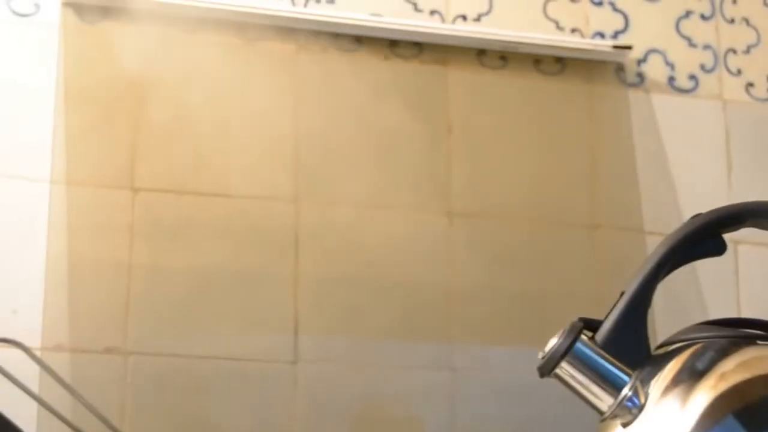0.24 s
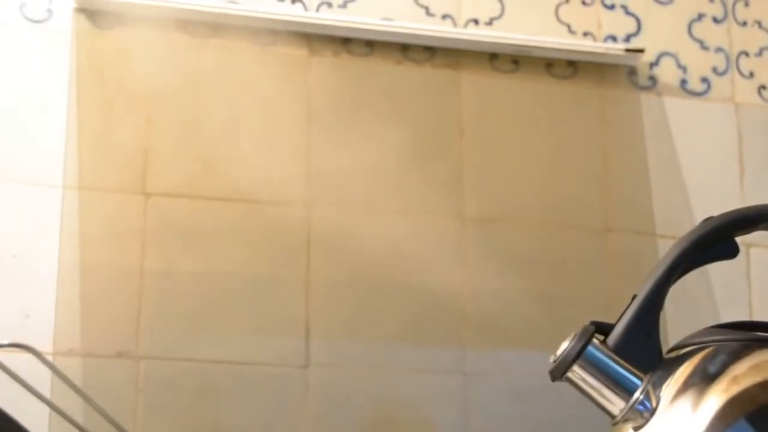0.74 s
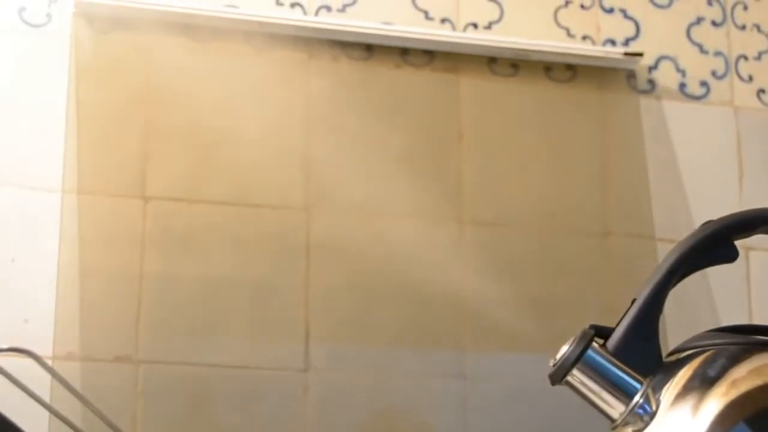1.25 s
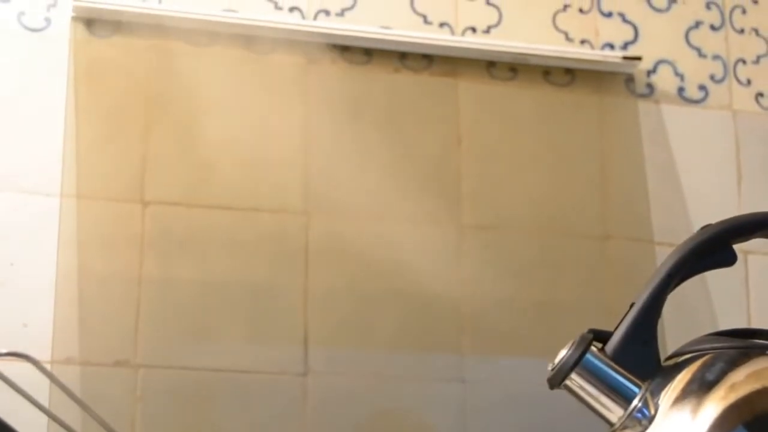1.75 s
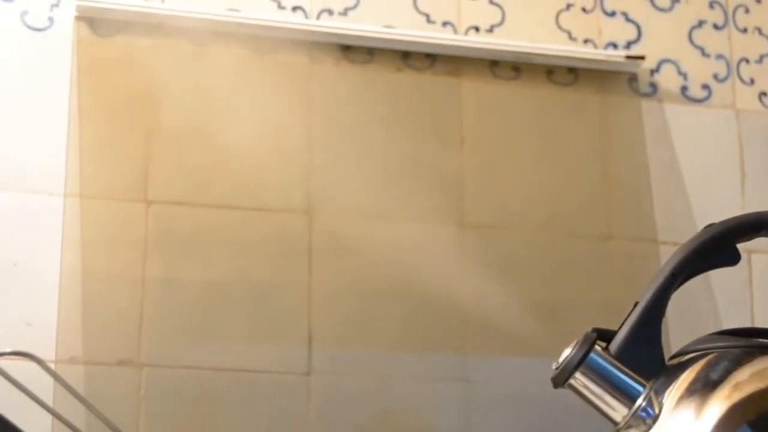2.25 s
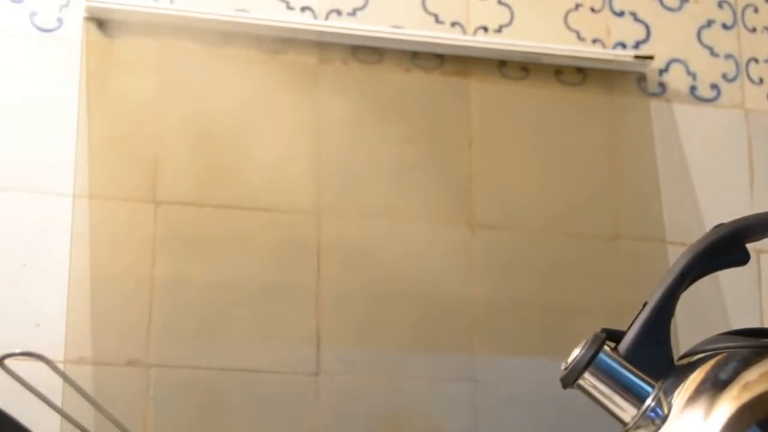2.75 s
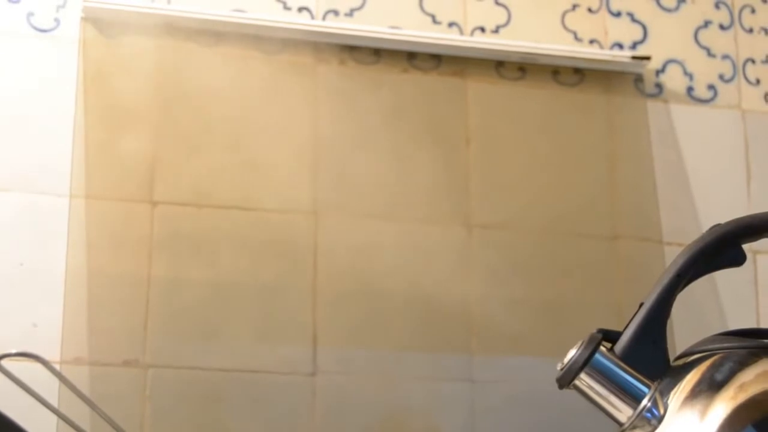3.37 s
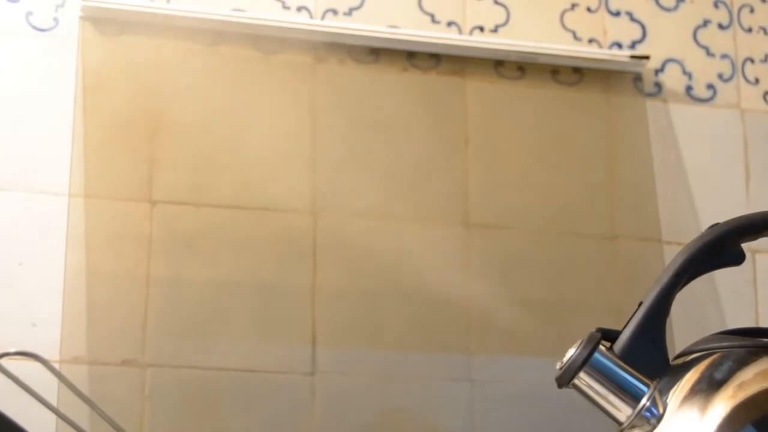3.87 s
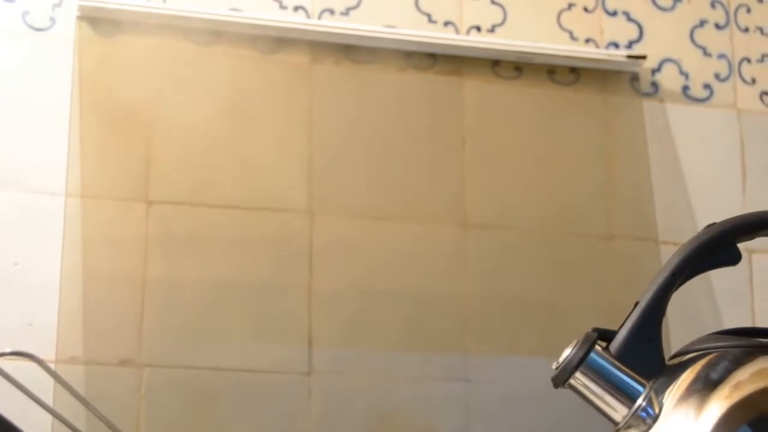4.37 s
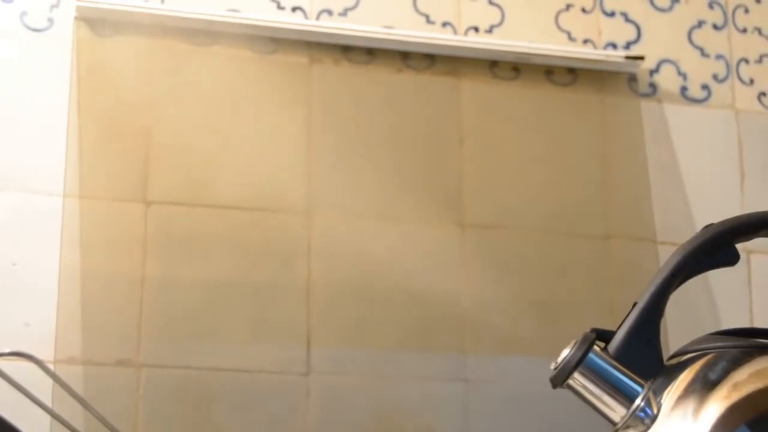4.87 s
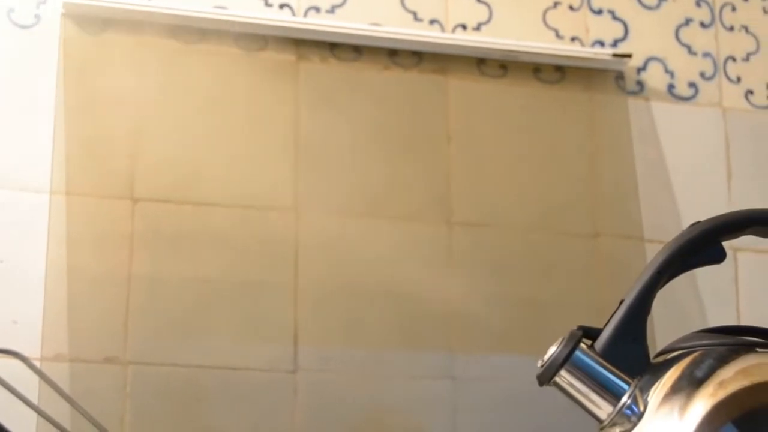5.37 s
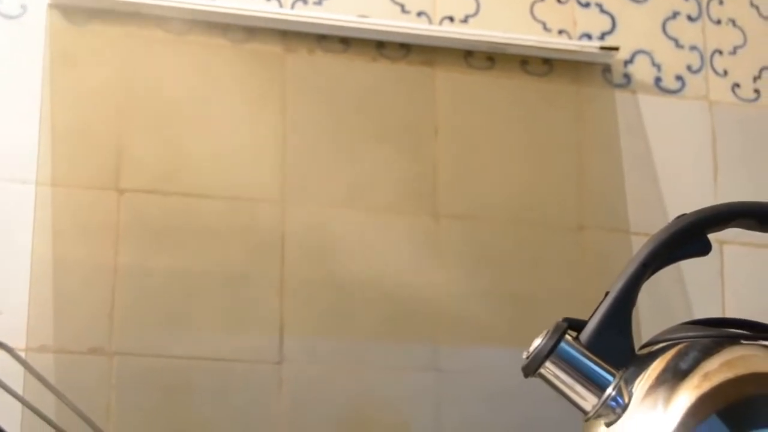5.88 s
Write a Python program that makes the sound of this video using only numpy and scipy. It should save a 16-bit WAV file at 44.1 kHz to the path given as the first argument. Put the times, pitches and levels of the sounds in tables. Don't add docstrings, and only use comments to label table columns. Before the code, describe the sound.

A stovetop kettle whistles a high, breathy, wavering note over hissing steam, with tiny droplet spits and a soft gas flame rush beneath.

```python
import sys
import numpy as np
from scipy import signal
from scipy.fft import rfft, irfft, next_fast_len
from scipy.io import wavfile
from scipy.ndimage import uniform_filter1d, map_coordinates

SR = 44100
rng = np.random.default_rng(int(sys.argv[2]) if len(sys.argv) > 2 else 0)


def unload_audio(sound):
    columns = np.transpose(np.atleast_2d(sound))
    steps = np.round(np.clip(columns, -1, 1) * 32767)
    wavfile.write(sys.argv[1], SR, steps.astype(np.int16))


def voltage_ratio(level):
    return 10 ** (np.asarray(level, float) / 20)


N = 269451
T = np.arange(N) / SR


def unit(x):
    return x / np.sqrt(np.mean(np.abs(x) ** 2) + 1e-20)


def along(points, hz):
    f, v = np.transpose(points)
    return np.interp(np.log(hz + 1), np.log(f + 1), v)


def curves(rows):
    time_s, *columns = np.transpose(rows)
    return [np.interp(T, time_s, column) for column in columns]


def wobble(rate_hz):
    knots = rng.standard_normal(1000)[:int(N * rate_hz / SR) + 4]
    return map_coordinates(knots, [T * rate_hz], mode="nearest")


def drift(bandwidth_hz):
    slow = signal.lfilter([1], np.poly([.8, .8]), rng.standard_normal(N))
    position = np.cumsum(bandwidth_hz) / SR * 2 * np.pi / np.log(1.25)
    return unit(map_coordinates(slow, [position]))


def filtered(x, response):
    m = next_fast_len(N + SR)
    return irfft(rfft(x, m) * response(np.fft.rfftfreq(m, 1 / SR)), m)[:N]


def rush(response, patchy_db):
    z = signal.stft(rng.standard_normal(N + 1024), nperseg=512)[2]
    field = uniform_filter1d(rng.standard_normal(z.shape), size=6, axis=0)
    field = uniform_filter1d(field, size=8, axis=1)
    noise = signal.istft(z * voltage_ratio(patchy_db * unit(field)), nperseg=512)[1][:N]
    return unit(filtered(noise, response))


def cavities(modes):
    def response(hz):
        power = 0
        for centre, width, db in modes:
            resonance = hz * width / (centre * centre - hz * hz + 1j * hz * width)
            power = power + voltage_ratio(2 * db) * np.abs(resonance) ** 4
        return np.sqrt(power)
    return response


def standing(waves, hz):
    return voltage_ratio(sum(db * np.exp(-4 * np.log(2) * ((hz - c) / w) ** 2) for c, w, db in waves))


# (time [s], hiss [dB], whistle [dB], pitch rise [Hz])
SURGES = [(.28, 3, 2, 0), (.65, 0, 2, 0), (1.12, 0, 2, -0.5), (1.68, 4, 0, 0), (2.0, -4, 1, 1.5),
          (2.15, 2, 0.5, 0), (2.4, 3, -1, -0.5), (2.68, 3, 2, 30.5), (3.0, 3, 0, 0), (3.62, -1, 2.5, 0),
          (3.9, 3, 0.5, 0), (4.27, 4.5, 2.5, 0.5), (4.48, 3, 2, -0.5), (4.87, 1.5, 2.5, 46.5),
          (5.2, 0.5, -0.5, -0.5), (5.38, -0.5, 2, 10), (5.679, 0.5, 0.5, 65.5), (5.84, 1, 4, -0.5),
          (6.1, 4, 0.5, 2.5)]


def surges():
    half_length_s = .055
    return sum(np.outer(gains, np.exp(-.5 * ((T - s) / half_length_s) ** 2)) for s, *gains in SURGES)


# (time [s], pitch [Hz], whistle level [dB])
STEAM = [(0, 5450, -32.5), (.17, 5400, -33.8), (.31, 5535, -34), (.5, 5310, -34.8), (.9, 5505, -33.2),
         (1.17, 5275, -33.8), (1.46, 5400, -35), (1.65, 5320, -33.3), (2.08, 5410, -32.7),
         (2.27, 5330, -34.7), (2.43, 5535, -31.5), (3.0, 5530, -33), (3.35, 5470, -34.4),
         (3.62, 5650, -31.7), (3.97, 5490, -31.2), (4.3, 5590, -30.5), (5.2, 5520, -30.5),
         (6.11, 5550, -29.7)]


def note():
    return curves(STEAM)[0] + surges()[2]


# (frequency [Hz], gain [dB])
CHAMBER = [(4700, -1), (4980, -1.5), (5120, 3), (5720, 1), (5850, 3), (6300, -5)]


def whistle(level_db):
    spread_hz = 120 - 9 * T
    locked = np.clip((150 - spread_hz) / 110, .1, .9)
    jitter_hz = spread_hz * (.1 * wobble(14) + .9 * drift(np.full(N, 95.)))
    turbulence = drift(1.2 * spread_hz) + 1j * drift(1.2 * spread_hz)
    centre = 2 * np.pi * np.cumsum(note()) / SR
    jitter = 2 * np.pi * np.cumsum(jitter_hz) / SR
    tone = np.sqrt(2 * locked) * voltage_ratio(0.35 * wobble(40)) * np.cos(centre + jitter)
    breath = np.sqrt(1 - locked) * (turbulence * np.exp(1j * centre)).real
    return voltage_ratio(level_db) * unit(filtered(tone + breath, lambda hz: voltage_ratio(along(CHAMBER, hz))))


# (centre [Hz], width [Hz], level [dB])
CAP = [(2470, 195, -7), (2761, 395, -0.5), (2960, 210, -2), (3150, 540, 2), (3300, 92, 2),
       (3480, 160, -7.5), (4520, 140, -9)]
# (frequency [Hz], density [dB per Hz])
JET = [(3500, -26.5), (4700, -13.5), (5200, 11), (5900, 10.5), (6400, 7), (6750, -1.5), (7100, 0),
       (7800, -8), (8400, -0.5), (9300, -3.5), (10000, -12), (11500, -21)]


def hiss(cap_db, jet_db):
    surge = wobble(22)
    lean_db = (uniform_filter1d(note(), size=SR) - 5470) / 75
    lower = voltage_ratio(-3.0 - lean_db + 0.57 * wobble(30)) * rush(cavities(CAP[:3]), patchy_db=1.9)
    upper = voltage_ratio(-4.0 + .6 * lean_db + 0.35 * wobble(30)) * rush(cavities(CAP[3:]), patchy_db=1.3)
    jet = rush(lambda hz: voltage_ratio(along(JET, hz)), patchy_db=1.5)
    jet *= voltage_ratio(jet_db + 0.71 * surge + 0.87 * wobble(35))
    return voltage_ratio(cap_db + 0.64 * surge) * (lower + upper) + jet


# (time [s], peak [dB], pitch [Hz], fizz [dB])
SPITS = [
    (0.3441, -28.5, 3530, -6),
    (1.3185, -36, 3150, -0.5),
    (1.6038, -47, 3480, -5),
    (2.2066, -32, 3150, -5),
    (2.913, -36.5, 3177, -2),
    (4.434, -29.5, 3190, -6),
    (5.675, -40, 3144, 5.5),
    (3.65, -47, 3320, 5),
    (3.762, -47.5, 3300, 6),
]


def spits():
    rings, puffs, t = np.zeros(N + SR), np.zeros(N + SR), T[:SR // 10]
    for s, db, hz, fizz_db in SPITS:
        start = round(s * SR)
        rise = voltage_ratio(db) * (1 - np.exp(-t / 0.00097))
        rings[start:][:len(t)] += rise * np.sin(2 * np.pi * hz * t) * voltage_ratio(-60 * t / 0.042)
        puffs[start:][:len(t)] += rise * voltage_ratio(fizz_db - 60 * t / 0.046) * rng.standard_normal(len(t))

    def cap_and_jet(hz):
        return voltage_ratio(11) * cavities(CAP)(hz) + voltage_ratio(7) * (hz > 6500) * voltage_ratio(along(JET, hz))
    return rings[:N] + filtered(puffs[:N], cap_and_jet)


# (frequency [Hz], density [dB per Hz])
FLAME = [(20, -24), (60, -18.5), (110, -9.5), (200, -6.5), (500, 0), (1200, 1), (2100, -2), (4200, -6.5),
         (6000, -12), (11000, -10.5)]
# (centre [Hz], width [Hz], gain [dB])
HOB_STANDING = [(134, 14, 5.3), (180, 16, 8.6), (232, 44, 5.7), (309, 18, 6.9), (416, 20, -7.4),
                (494, 27, 6.9), (614, 28, 6.2), (685, 28, -5.9), (722, 16, 4.4), (883, 18, 4.9),
                (1095, 25, 5.0), (1154, 26, 4.7), (1333, 66, 14.0), (1346, 90, -11.5), (1767, 36, 5.2),
                (1910, 27, -5.7), (1958, 25, 5.7), (2034, 17, -7.3), (2094, 27, -5.6), (2145, 26, -4.7)]


def burner():
    return voltage_ratio(-52.0) * rush(lambda hz: voltage_ratio(along(FLAME, hz)) * standing(HOB_STANDING, hz), patchy_db=0.9)


# (delay [ms], gain [ratio])
ECHOES = [(2.529, 0.12), (2.754, -0.16), (3.127, 0.18), (3.22, 0.13), (3.604, -0.07), (4.62, -0.11),
          (5.291, -0.07), (5.889, -0.08), (8.419, 0.07), (9.671, -0.09), (10.219, -0.09), (11.217, 0.07),
          (11.784, -0.08), (12.918, -0.07)]
# (centre [Hz], width [Hz], gain [dB])
STANDING = [(2564, 15, -6.3), (2600, 28, 4.5), (2697, 17, 9.5), (2807, 12, -6.6), (2842, 31, 7.9),
            (3150, 22, 4.9), (3237, 25, -3.9), (3306, 12, -7.2), (3494, 62, 4.1), (3540, 14, -6.1),
            (5031, 19, -7.9), (5180, 15, 3.7), (5259, 24, 5.0), (5370, 13, 4.0), (5426, 30, 6.5),
            (5518, 35, -10.8), (5518, 68, 11.5), (5567, 13, -8.0), (5586, 12, 5.9), (5667, 64, 3.3),
            (5754, 16, -4.3), (5835, 76, -1.5), (5895, 15, -7.9), (6168, 54, 3.6), (6210, 14, -7.5),
            (6263, 26, -6.0), (6284, 34, 5.8), (6344, 17, 5.7), (6464, 46, 3.7), (6572, 31, 4.1)]
# (frequency [Hz], level [dB])
DIFFUSE = [(100, -10), (2200, -10), (2500, -15), (3600, -15), (3800, -3), (4900, -3), (5100, -14),
           (6500, -14), (6800, -2), (11000, -2)]


def kitchen(x):
    t = T[:SR // 2]
    decay = voltage_ratio(-60 * t / .45)
    tail = np.pad(rng.standard_normal(len(t)) * decay, (300, 0))
    reverb = signal.fftconvolve(x, tail / np.linalg.norm(tail))[:N]
    diffuse = filtered(reverb, lambda hz: voltage_ratio(along(DIFFUSE, hz)))

    def near(hz):
        echoes = sum(gain * np.exp(-2j * np.pi * hz * ms / 1000) for ms, gain in ECHOES)
        return (1 + echoes) * standing(STANDING, hz)
    return filtered(x, near) + diffuse


def scene():
    gulp_db, swell_db, _ = surges()
    pitch_hz = note()
    whistle_db = curves(STEAM)[1] - 3.6 + swell_db
    cap_db = -45.67 + .7 * gulp_db
    jet_db = -41.5 + 0.0092 * (pitch_hz - pitch_hz.mean()) + .3 * gulp_db
    kettle = whistle(whistle_db) + hiss(cap_db, jet_db) + spits()
    flame = burner()
    treble = filtered(flame, lambda hz: hz > 2250)
    return (kitchen(kettle + voltage_ratio(-1.0) * treble) + flame - treble)[None]


def low_pass(x):
    return signal.sosfilt(signal.butter(12, 11090, fs=SR, output="sos"), x)


# (frequency [Hz], gain [dB])
TOP = [(10800, -1), (10950, -4), (11100, -19), (11250, -53), (11400, -90)]


def record(dry):
    mix = filtered(dry[0], lambda hz: voltage_ratio(along(TOP, hz)))[None]
    return low_pass(mix)


dry = scene()
out = record(dry)
unload_audio(out)
```